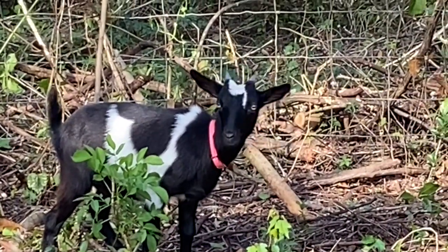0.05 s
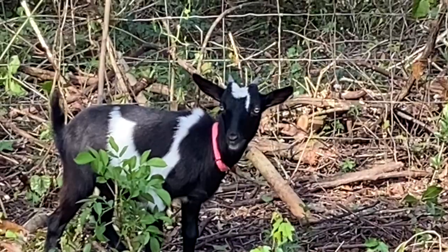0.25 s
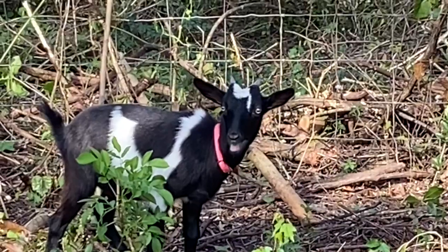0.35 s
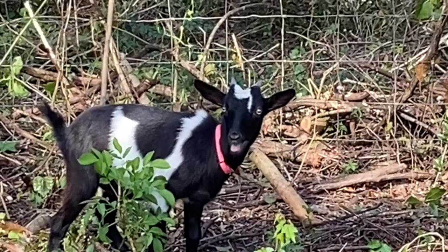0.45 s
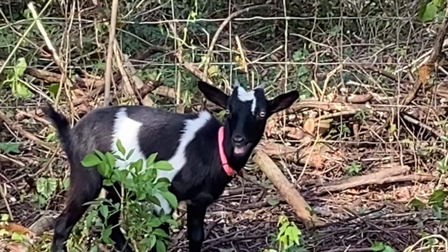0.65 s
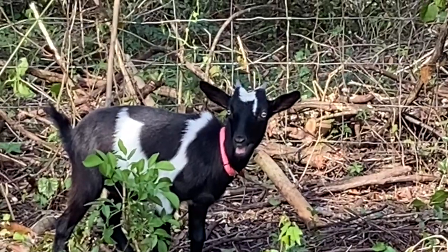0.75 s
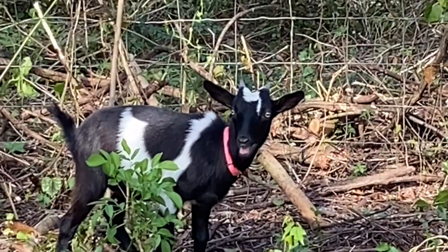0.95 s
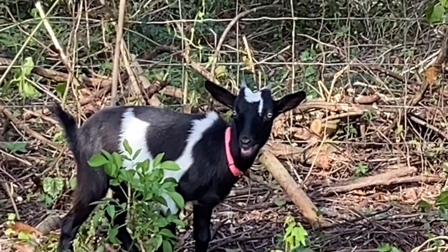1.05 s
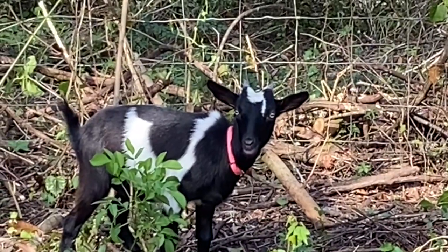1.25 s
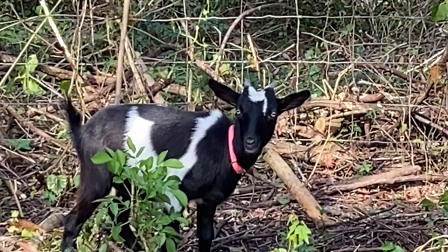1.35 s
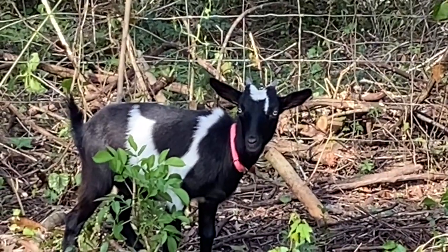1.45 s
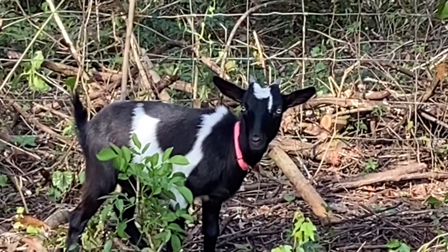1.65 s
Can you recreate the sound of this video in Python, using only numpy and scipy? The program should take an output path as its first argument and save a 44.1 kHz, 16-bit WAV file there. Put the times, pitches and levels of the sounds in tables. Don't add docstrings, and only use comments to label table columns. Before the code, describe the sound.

Loud quavering bleat from a small goat, a second shorter push following at once and fraying into rasp, slightly overloaded on the microphone; behind it thin cricket tones, soft air and a slowly rising engine hum.

```python
import sys
import numpy as np
from scipy import signal
from scipy.fft import rfft, irfft, next_fast_len
from scipy.io import wavfile
from scipy.ndimage import uniform_filter1d

SR = 44100
rng = np.random.default_rng(int(sys.argv[2]) if len(sys.argv) > 2 else 0)


def to_wav(sig):
    pcm = np.clip(np.atleast_2d(sig), -1, 1) * 32767
    pcm = np.round(pcm).astype(np.int16)
    wavfile.write(sys.argv[1], SR, pcm.T)


def gain_from_db(level_db):
    decades = np.asarray(level_db, float) / 20
    return 10 ** decades


N = 74970
T = np.arange(N) / SR


def evened(x):
    return x / np.sqrt(np.mean(x ** 2) + 1e-20)


def read(points, hz):
    f, value = np.transpose(points)
    return np.interp(np.log(hz + 1), np.log(f + 1), value)


def resonate(x, hz, width_hz):
    turn = np.exp(2j * np.pi * np.cumsum(hz * np.ones(len(x))) / SR)
    r = np.exp(-np.pi * width_hz / SR)
    smooth = signal.lfilter([(1 - r) ** 2], [1, -2 * r, r * r], x / turn + 1e-18)
    return 2 * (turn * smooth).real


def highpass(x, hz, order):
    return signal.sosfilt(signal.butter(N=order, Wn=hz, btype="high", fs=SR, output="sos"), x)


def drift(span_s):
    size = round(span_s * SR)
    return evened(uniform_filter1d(uniform_filter1d(rng.standard_normal(N), size), size))


def noise_line(hz, width_hz, level_db):
    return gain_from_db(level_db) * evened(resonate(rng.standard_normal(N), hz, width_hz))


# frequency_hz, likeness (0-1)
LIKENESS = [(60, 1), (200, 1), (600, 0.6), (1600, 0.59), (2300, .97), (3000, 0.98)]


def bed(colour, level_db, lo_hz, hi_hz, patchy_db):
    frames, hz = N // 512 + 5, np.fft.rfftfreq(2048, 1 / SR)
    a, b, c, d, patches = rng.standard_normal((frames, 1025, 5)).T
    patches = evened(uniform_filter1d(uniform_filter1d(patches, 14, 0), 6, 1))
    same = np.clip(read(LIKENESS, hz), -1, 1)[:, None]
    left = a + 1j * b
    right = same * left + np.sqrt(1 - same ** 2) * (c + 1j * d)
    gain = gain_from_db(read(colour, hz))
    inside = (hz > lo_hz) & (hz < hi_hz)
    share = np.sqrt(np.sum(gain[inside] ** 2) / np.sum(gain ** 2))
    z = np.array([left, right]) * gain[:, None] * gain_from_db(patchy_db * patches)
    noise = signal.istft(z, nperseg=2048, noverlap=1536)[1][:, :N]
    return gain_from_db(level_db) / share * evened(noise)


# frequency_hz, level_db (per Hz)
AIR_COLOUR = [(15, -45), (25, -14.5), (134, -7.5), (182, -6), (288, -25), (724, -32.5), (1970, -33.5),
              (2410, -36.5), (3000, -37), (3900, -59), (6600, -120)]


def air():
    fade_db_per_s = -3.5
    return bed(AIR_COLOUR, -51.5, 200, 2800, patchy_db=3.0) * gain_from_db(fade_db_per_s * (T - 2.0))


# start_s, pitch_hz, level_db
ENGINE_HUM = [
    (0.0, 166.7, -28.5),
    (0.188, 167.8, -27.5),
    (0.326, 175, -29),
    (0.364, 174.9, -30),
    (1.406, 182.4, -30.5),
    (1.7, 181.6, -33.5),
]
# pitch_hz, width_hz, level_db
ENGINE_DRONES = [(144.7, 2, -41.5), (100.1, 5.8, -44.5), (57.4, 3.4, -45), (81, 2.7, -50), (210, 3.9, -83)]


def engine():
    wobble_db = 3
    s, hz, level_db = np.transpose(ENGINE_HUM)
    tone = np.sqrt(2) * np.sin(2 * np.pi * np.cumsum(np.interp(T, s, hz)) / SR)
    hum = tone * gain_from_db(np.interp(T, s, level_db) + wobble_db * drift(0.13))
    return hum + sum(noise_line(*drone) for drone in ENGINE_DRONES)


# frequency_hz, level_db (per Hz)
CHORUS_COLOUR = [(1760, -59.5), (3000, -17), (3900, -2), (5300, 3.5), (6400, -2.5), (7400, 15.5),
                 (8800, -0.5), (16000, -18)]


def chorus():
    return bed(CHORUS_COLOUR, -33.5, 3000, 16000, patchy_db=.5)


# pitch_hz, width_hz, level_db, start_s, end_s
CRICKET_LINES = [(3817, 8, -55, .9, 2), (4404, 8, -49, 1.36, 2), (5577, 10, -52, 1.2, 2),
                 (8807, 10, -52, 0, 2), (4110, 90, -48, 0, .4), (5450, 60, -50, 0, 1.3),
                 (5885, 10, -54, 0, .4), (8215, 10, -60, 1.4, 2), (8511, 10, -59, 1.2, 2)]


def crickets():
    fade_s = 0.11
    lines = 0
    for hz, width_hz, level_db, start_s, end_s in CRICKET_LINES:
        fade = np.clip(np.minimum(T - start_s, end_s - T) / fade_s + 1, 0, 1)
        lines = lines + noise_line(hz, width_hz, level_db) * fade
    return lines


# centre_s, half_width_s, pitch_hz, width_hz, level_db
LEAF_STIR = (1.237, .035, 1700, 700, -49)


def leaf():
    at, half_s, hz, width_hz, level_db = LEAF_STIR
    return noise_line(hz, width_hz, level_db) * np.exp(-((T - at) / half_s) ** 2)


# peak_s, lift_hz
THROAT_PUSHES = [(0.32, 19.7), (0.386, 21.4), (0.455, 17.6), (.518, 27), (.594, 48), (0.671, 50),
                 (0.715, 35), (0.902, 24), (.945, 16.6)]


def quaver():
    rise_s, fall_s = .022, 0.0092
    return sum(lift_hz * np.exp(-((T - at) / np.where(T < at, rise_s, fall_s)) ** 2)
               for at, lift_hz in THROAT_PUSHES)


# centre_s, depth_db, half_width_s
BREATH_CATCHES = [(.555, -4, .015), (.628, -5, .009), (.711, -7, .011), (.945, -3, .01)]


def catches():
    return sum(depth_db * np.exp(-((T - at) / half_s) ** 2) for at, depth_db, half_s in BREATH_CATCHES)


def folds_and_breath(hz, rough):
    jitter, shimmer_db, rasp_db = 0.0028, 1, 2.9
    turns = np.cumsum(hz * (1 + jitter * (1 + 8 * rough) * drift(0.0035))) / SR
    folds = evened(sum(np.cos(2 * np.pi * k * turns) for k in range(1, 41)))
    puffs = evened((0.22 + np.exp(-(turns % 1) / 0.23)) * rng.standard_normal(N))
    rasp = highpass(puffs, 1900, order=2) + (.25 + rough ** 2) * puffs
    clean = np.sqrt(1 - rough ** 2) * folds * gain_from_db(shimmer_db * drift(0.012))
    return clean + rough * rasp * gain_from_db(rasp_db * drift(.012)), puffs


# start_s, pitch_hz, effort_db, roughness (0-1), mouth_hz
FIRST_BLEAT = [
    (0.187, 360, -45, 0.1, 790),
    (0.221, 454.5, -14.5, 0, 1110),
    (0.251, 484.7, -12, 0.11, 1330),
    (0.288, 514, -7, 0, 1352),
    (0.409, 511.5, -6, 0.04, 1440),
    (0.479, 493.2, -9.5, 0, 1380),
    (0.548, 472.8, -8, 0, 1386),
    (0.647, 457.6, -10, 0.16, 1435),
    (0.699, 442.1, -12.5, 0.08, 1320),
]
# start_s, pitch_hz, effort_db, roughness (0-1), mouth_hz
SECOND_BLEAT = [
    (.732, 405.7, -12, 0.23, 1300),
    (.752, 394.2, -12.5, 0.14, 1260),
    (0.812, 440.4, -11.5, 0.14, 1330),
    (.86, 466.2, -11, 0, 1420),
    (0.931, 447, -11.5, 0.15, 1355),
    (.975, 433, -19.5, 0.3, 1326),
    (1.0, 369.4, -24, 0.78, 1285),
    (1.031, 325.6, -33, 1.2, 1188),
    (1.066, 308, -52, 0.94, 1155),
]
# pitch_hz, width_hz, level_db
THROAT_RESONANCES = [(2050, 350, -8), (2450, 350, -10), (3060, 250, 0), (3600, 300, -9), (4150, 400, -6),
                     (4650, 400, -6), (5200, 400, -5), (6200, 600, -11), (7200, 900, -13),
                     (8500, 1400, -16), (10800, 1400, -21), (12600, 2000, -28), (14800, 2000, -35)]


def goat():
    s, *columns = np.transpose(FIRST_BLEAT + SECOND_BLEAT)
    hz, effort_db, rough, mouth_hz = (uniform_filter1d(np.interp(T, s, c), size=400) for c in columns)
    catch_db = catches()
    rough = np.clip(rough - .045 * catch_db, 0, 1)
    drive, puffs = folds_and_breath(hz + quaver(), rough)

    bright_per_db, loud_db = 0.65, -10.5
    throat_db = bright_per_db * (effort_db - loud_db) - 0.1 * catch_db
    throat = gain_from_db(throat_db) * sum(gain_from_db(db) * resonate(drive, f, w) for f, w, db in THROAT_RESONANCES)
    mouth = resonate(drive, mouth_hz, 337)
    nose = gain_from_db(-2) * resonate(drive, 1028.5, 168)
    breath = gain_from_db(-19) * resonate(puffs, 1250, 82)
    voice = highpass(throat + mouth + nose + breath, 648, order=4)
    return 3 * voice * gain_from_db(effort_db + catch_db) * (T > s[0]) * (T < s[-1])


# delay_s, level_db
TRUNK_REFLECTIONS = [(.0021, -33), (.0067, -12), (0.012, -37), (0.019, -16.5)]
# frequency_hz, t60_s
WOODS_T60 = [(500, 0.13), (1500, 0.96), (4000, 0.81), (10000, 0.15)]


def woods(x):
    far_db, near_db, near_t60_s = -30, -15, .09
    hz, t, z = signal.stft(rng.standard_normal((2, SR)), SR, nperseg=256)
    far = signal.istft(z * gain_from_db(-60 * t / read(WOODS_T60, hz)[:, None]), SR, nperseg=256)[1]
    near = rng.standard_normal((2, SR // 2)) * gain_from_db(-60 * T[:SR // 2] / near_t60_s)
    wet = 0
    for level_db, tail in ((far_db, far), (near_db, near)):
        tail = tail / np.linalg.norm(tail[0])
        wet = wet + gain_from_db(level_db) * signal.fftconvolve(x[None], tail, axes=1)[:, :N]
    side = gain_from_db(4) * resonate(wet[1], 2640, 4500)
    echoes = sum(gain_from_db(db) * np.interp(T - delay_s, T, x) for delay_s, db in TRUNK_REFLECTIONS)
    return x + echoes + wet[0] + np.array([side, -side])


def scene():
    insects = crickets() + leaf() + chorus()
    return air() + engine() + insects + woods(goat())


# frequency_hz, left_lead (half turns)
WIDENER_LEAD = [(0, -0.021), (900, -0.059), (1600, 0.014), (2250, -0.015), (3600, -0.1), (4300, .25),
                (5000, 0.19), (5700, -0.031),
                (6800, 1), (7850, 1), (9600, 2), (11250, 2), (12700, 3), (14350, 3), (15300, 4)]


def widen(x):
    size = next_fast_len(N + 4096)
    hz, half_turns = np.transpose(WIDENER_LEAD)
    turn = np.exp(.5j * np.pi * np.interp(np.fft.rfftfreq(size, 1 / SR), hz, half_turns))
    return irfft(rfft(x, size) * np.array([turn, 1 / turn]), size)[:, :N]


def low_pass(x):
    return signal.sosfilt(signal.butter(12, 15900, fs=SR, output="sos"), x)


def record(dry):
    mix = np.clip(widen(dry), -1.0, 1.0)
    return low_pass(mix)


dry = scene()
out = record(dry)
to_wav(out)
```